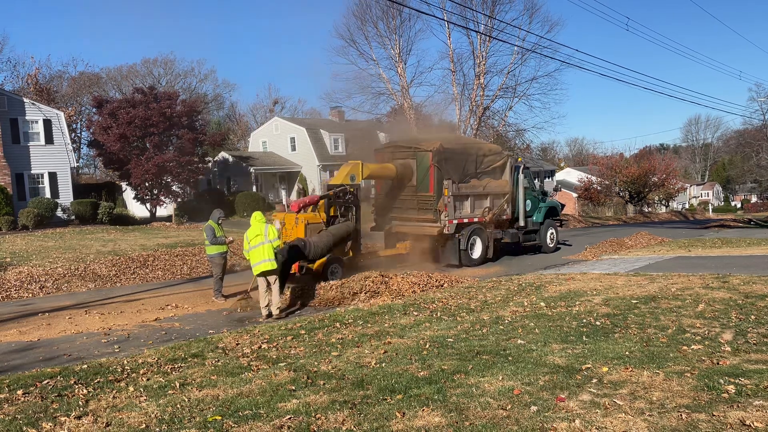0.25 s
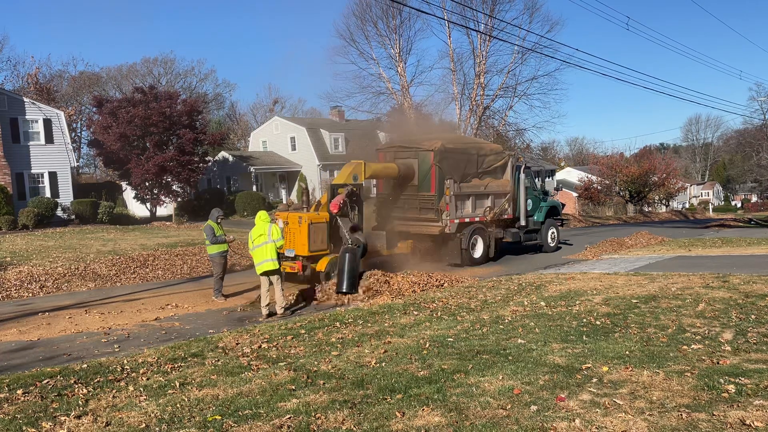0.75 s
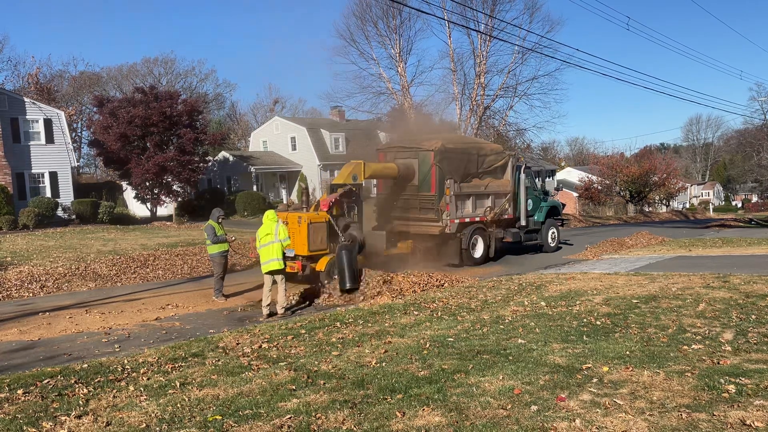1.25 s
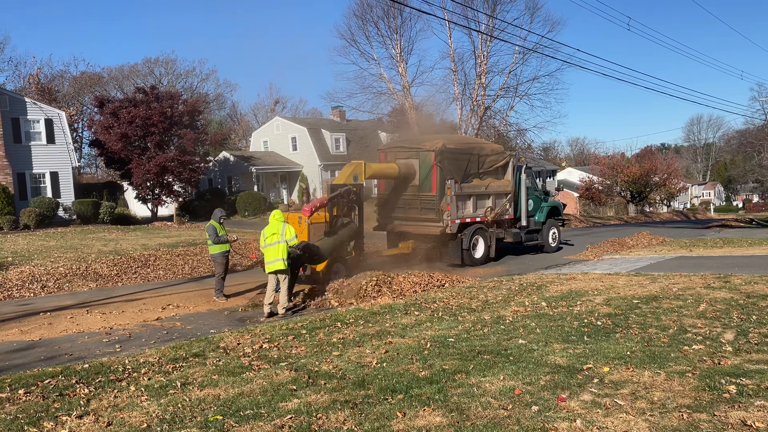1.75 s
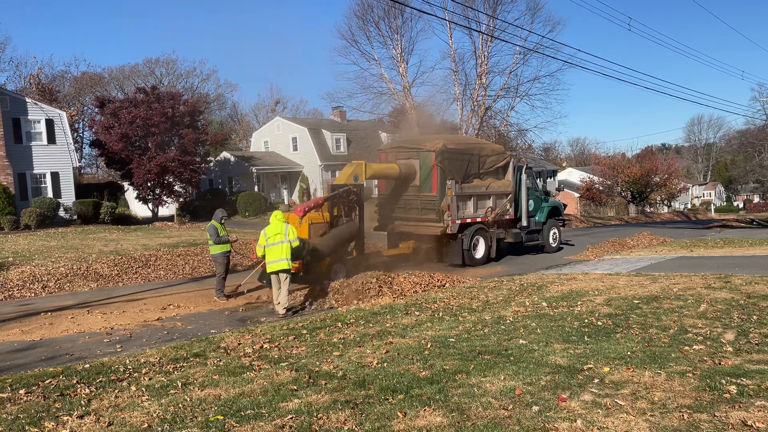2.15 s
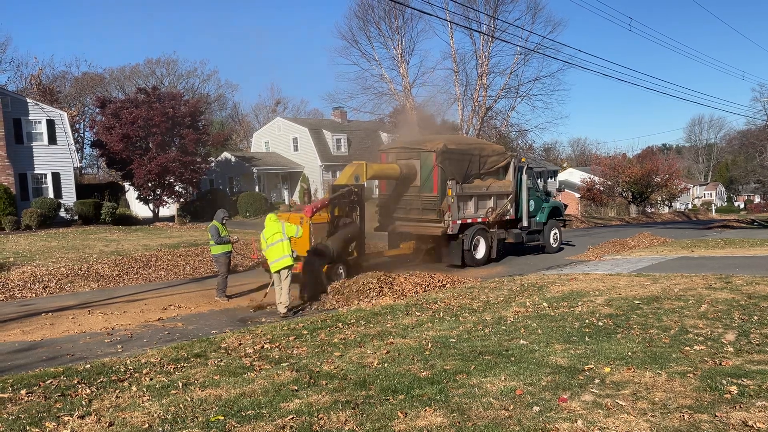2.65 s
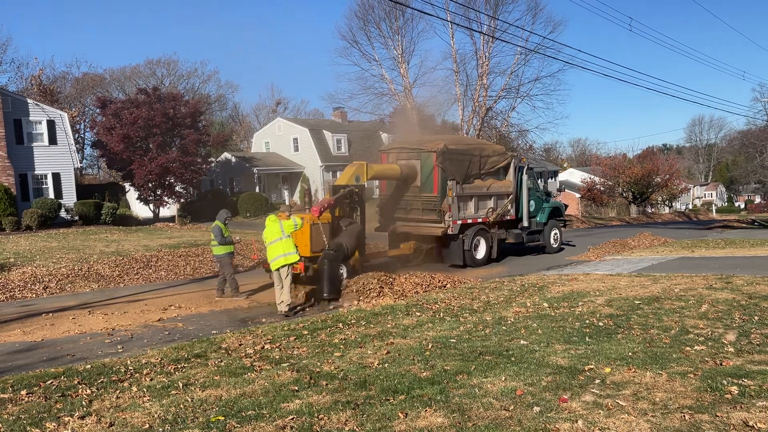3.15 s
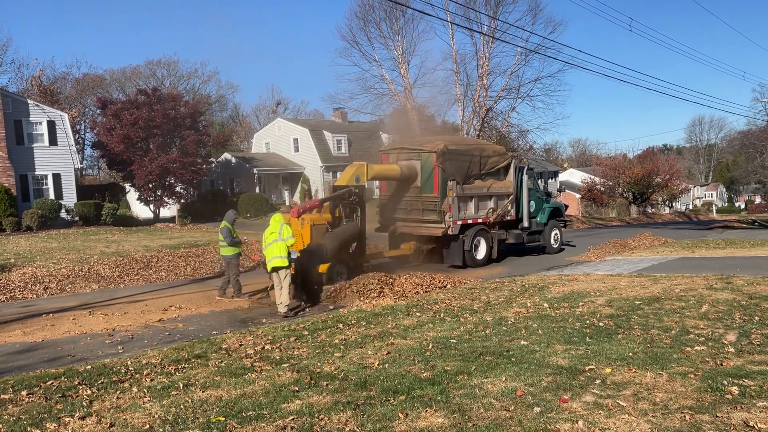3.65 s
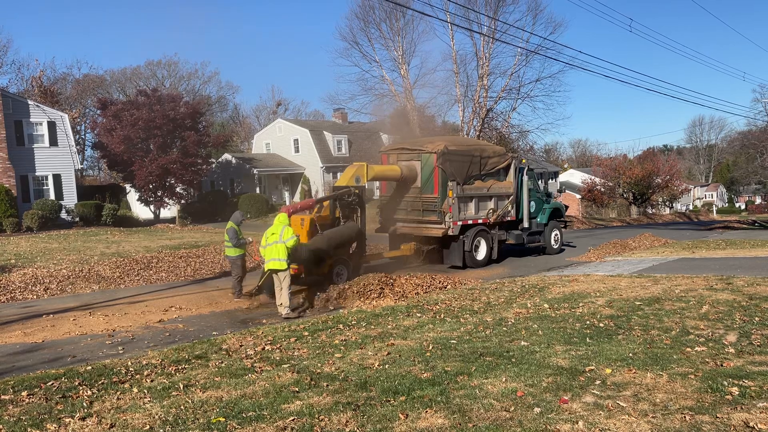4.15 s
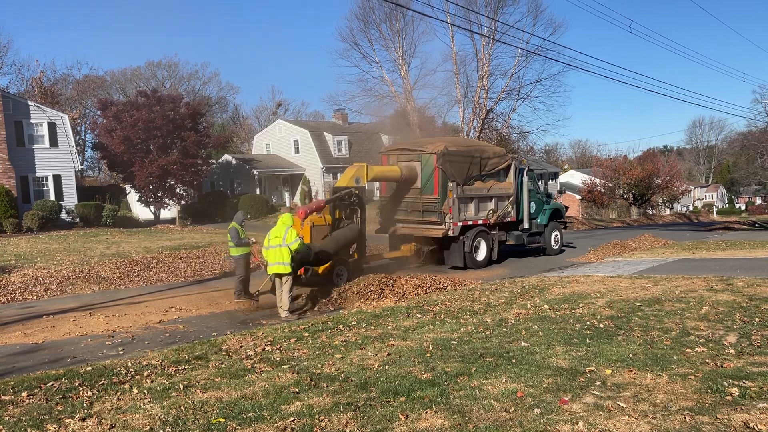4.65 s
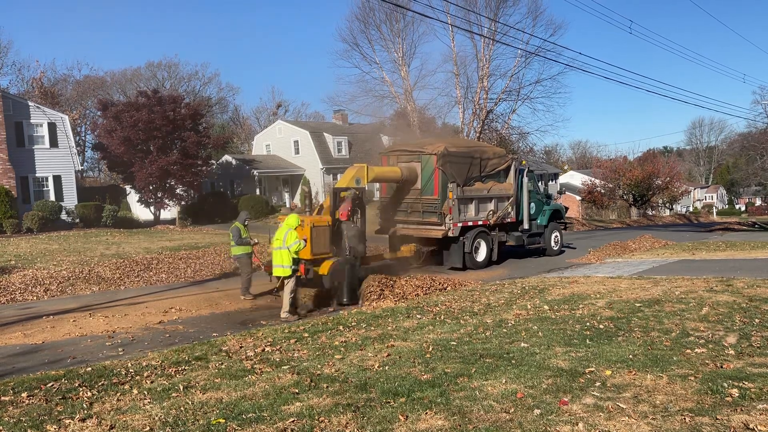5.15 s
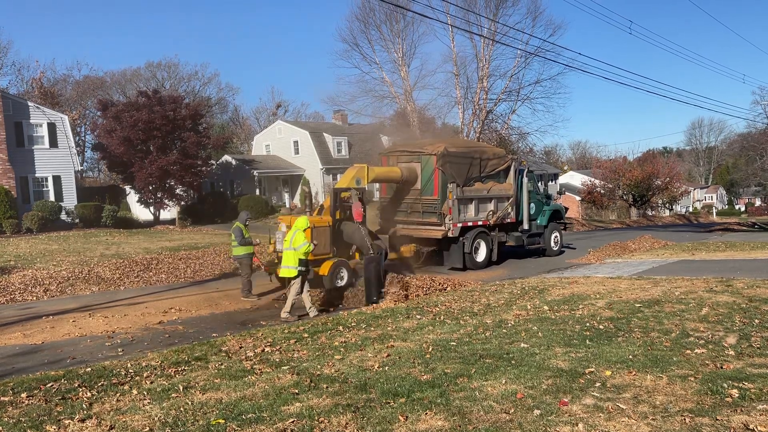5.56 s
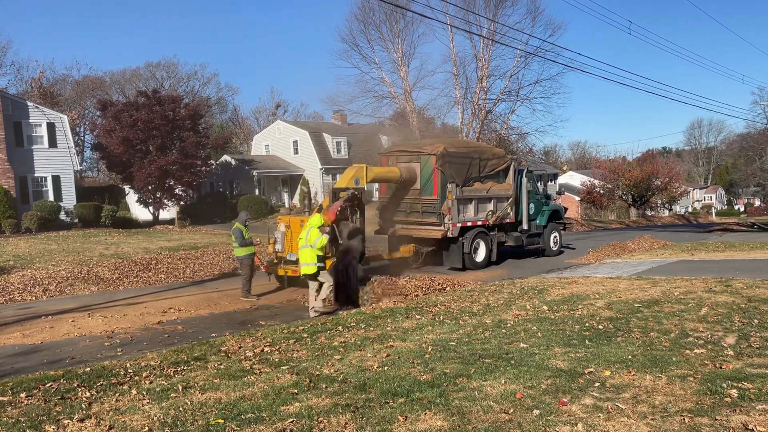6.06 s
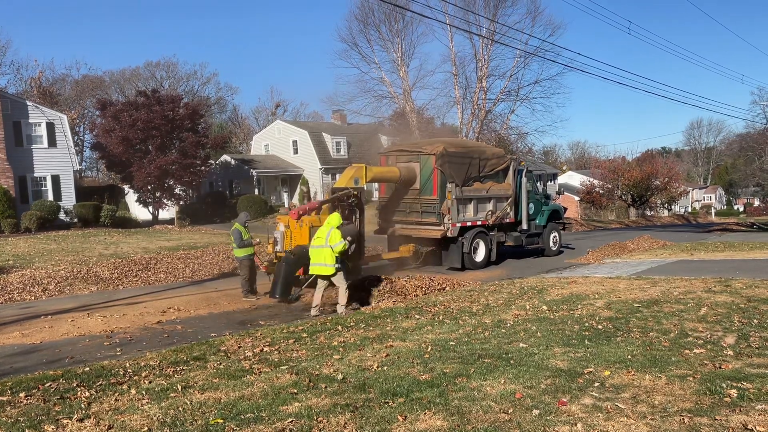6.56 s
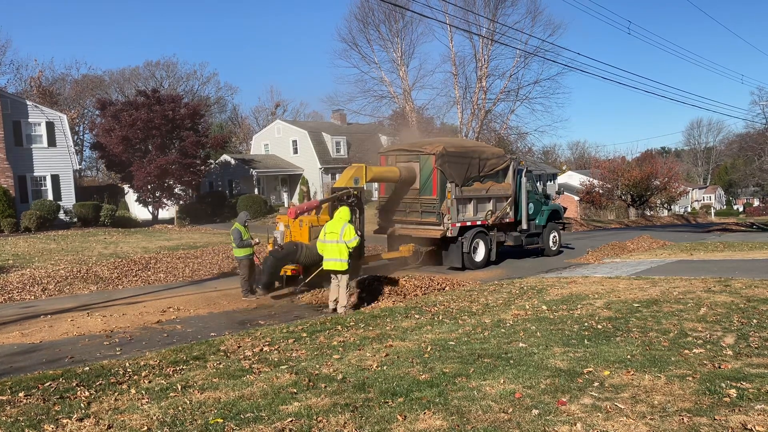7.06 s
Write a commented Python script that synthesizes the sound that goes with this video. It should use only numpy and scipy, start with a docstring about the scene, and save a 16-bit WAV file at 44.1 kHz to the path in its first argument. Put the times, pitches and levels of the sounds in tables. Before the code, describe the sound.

Outdoors on a breezy suburban street, a leaf vacuum's engine holds a low, steady drone under a broad fan roar. Dry leaves rush through hose and chute in swelling, crackling waves, with twigs and stones ticking on the housing. Wind flaps and rumbles close on a handheld phone microphone standing on a lawn across the road, strongest at the start and around the middle.

```python
"""The ear first meets an engine's drone, the hiss of dry leaves and flaps of wind: a truck-towed leaf vacuum
works across the street from a phone held on a lawn on a breezy day. The engine is a harmonic series on its
shaft rate, the fan's roar is shaped noise throbbing with the shaft, and leaves in fan, hose and chute are
noise streams with random crackles. Twigs and stones tick as short bursts of band noise; wind buffets the two
microphone ports as rumble, a brighter edge and puffs."""
import sys
import numpy as np
from scipy import signal
from scipy.fft import rfft, irfft, next_fast_len
from scipy.io import wavfile
from scipy.ndimage import uniform_filter1d

SR = 44100
rng = np.random.default_rng(int(sys.argv[2]) if len(sys.argv) > 2 else 0)


def waveform_to_disk(signal):
    """Save audio, clipped to [-1, 1], as 16-bit WAV at the path in sys.argv[1]."""
    frames = np.transpose(np.atleast_2d(signal))
    scaled = np.clip(frames, -1, 1) * 32767
    samples = np.round(scaled).astype(np.int16)
    wavfile.write(sys.argv[1], SR, samples)


def undo_db(level):
    """Turn decibels back into plain size, where 20 dB means ten times bigger."""
    steps = np.asarray(level, float) / 20
    return 10 ** steps


N = 322371  # length in samples
SIZE = next_fast_len(N, True)  # transform length
TIME = np.arange(N) / SR
HZ = np.maximum(np.fft.rfftfreq(SIZE, 1 / SR), 1)


def noise():
    """White noise: two statistically independent signals of unit variance."""
    return rng.standard_normal((2, N))


def colour(x, table):
    """Spectral shaping: white noise is weighted to a power density, straight in dB over log frequency."""
    hz, density_db = np.transpose(table)
    gain = undo_db(np.interp(np.log(HZ), np.log(hz), density_db)) * np.sqrt(SR / 2)
    return irfft(rfft(x, SIZE) * gain, SIZE)[..., :N]


def band(x, low_hz, high_hz, order=2):
    """Band-pass filtering: the gain offsets the narrower bandwidth, so unit white noise stays near unit rms."""
    edges = [low_hz, min(high_hz, .45 * SR)]
    y = signal.sosfilt(signal.butter(order, edges, "band", fs=SR, output="sos"), x)
    return y * np.sqrt(SR / 2 / (high_hz - low_hz))


def walk(rate_hz):
    """Smoothed random steps: levels held 1 / rate_hz seconds and averaged twice; spread near 1."""
    hold = int(SR / rate_hz)
    steps = np.repeat(rng.standard_normal(N // hold + 1), hold)
    return 1.14 * uniform_filter1d(uniform_filter1d(steps, hold), hold)[:N]


def bursts(rows, rise_s):
    """Exponential build-up and decay: the summed envelope of (time [s], level [dB], decay time [s]) rows."""
    env = np.zeros(N)
    for s, db, fall_s in rows:
        i = int(s * SR)
        t = TIME[:min(int(8 * fall_s * SR) + 1, N - i)]
        env[i:i + len(t)] += undo_db(db) * (1 - np.exp(-t / rise_s)) * np.exp(-t / fall_s)
    return env


# Engine speed, sagging under heavy loads:
# (time [s], shaft rate [turns per second, Hz], mean level of the sixth multiple [dB])
SHAFT = [(0.0, 32.36, -32), (0.38, 32.18, -21.5), (0.87, 32.19, -18), (1.1, 31.74, -27),
         (1.45, 31.49, -25.5), (1.89, 31.56, -17.5), (2.1, 31.64, -36), (2.54, 32.23, -19),
         (2.88, 32.42, -22), (3.2, 32.1, -30), (3.92, 32.14, -22), (4.2, 32.06, -31), (4.75, 32.29, -23),
         (5.4, 32.37, -18.5), (5.9, 31.8, -28), (6.16, 31.68, -22.5), (6.55, 31.87, -18), (6.82, 32.2, -34),
         (7.09, 32.45, -26), (7.3, 32.05, -32)]


def shaft_angle():
    """Rotation: the shaft's angle in radians is the running integral of its rate."""
    rate_hz = np.interp(TIME, *np.transpose(SHAFT)[:2])
    return 2 * np.pi * np.cumsum(rate_hz) / SR


# Firing tones: (multiple of the shaft rate, mean level [dB])
FIRING = [(2, -16), (4, -13.5)]
# Fainter exhaust tones: (multiple of the shaft rate, mean level [dB])
TONES = [(1, -41), (3, -34), (5, -38.5), (7, -33), (8, -43), (9, -47), (10, -41), (11, -39.5), (12, -37),
         (13, -70), (14, -72), (15, -49), (16, -70), (17, -38.5), (18, -39.5), (19, -37.5), (20, -41.5),
         (21, -44), (22, -40.5), (23, -49), (24, -45)]


def engine(turn):
    """Harmonic series: multiples of the shaft rate waver a little; uneven firing blurs the upper ones."""
    s, _, sixth_db = np.transpose(SHAFT)
    rows = TONES + FIRING + [(6, np.interp(TIME, s, sixth_db))]
    shake = .015 * walk(30)  # rad of shaft angle
    out = 0
    for k, db in rows:
        # the exhaust pipe delays each multiple a little more than the last
        phase = k * (turn + shake) - .7 * k * k
        waver_db = (.8 if k in (2, 4, 6) else 1.6) * walk(9)
        out = out + undo_db(db + waver_db) * np.sqrt(2) * np.cos(phase)
    return np.array([out, 0 * out])  # no unrelated part


# Fan and engine roar at the left port, with dips from the bounce off the road:
# (frequency [Hz], power density [dB per Hz])
ROAR = [(30, -44.5), (60, -37), (110, -48), (300, -52), (470, -69.5), (620, -50.5), (1000, -59),
        (1250, -58.5), (1470, -54.5), (1700, -60.5), (2000, -58), (2300, -66.5), (2600, -62), (4000, -78.5),
        (6000, -81), (8300, -91), (13000, -117.5), (16000, -88)]


def roar(turn):
    """Amplitude modulation: fan air and engine clatter throb with each firing and each turn."""
    throb = 1 + 0.024 * np.cos(2 * turn) + 0.056 * np.cos(turn) + 0.072 * np.cos(3 * turn)
    return colour(noise() * throb, ROAR)


# Leaves passing through: (time [s], rattle in the fan [dB], hiss in hose and chute [dB])
LOAD = [(0.0, -43, -35), (0.09, -34.5, -47), (0.27, -35.5, -46), (0.36, -30.5, -28), (0.55, -28.5, -33),
        (1.02, -28.5, -34), (1.5, -25, -32), (1.65, -29, -28.5), (1.9, -26, -37.5), (2.0, -31, -39),
        (2.27, -33.5, -42), (2.63, -28.5, -30.5), (3.12, -32, -33.5), (3.25, -33, -37.5), (3.5, -30.5, -32),
        (3.75, -30, -32), (4.0, -33, -38), (4.3, -34.5, -43), (4.65, -36.5, -44.5), (5.06, -30.5, -27.5),
        (5.24, -31, -32), (5.44, -28.5, -31), (5.69, -28, -34), (5.89, -27.5, -30), (6.52, -32, -34.5),
        (6.84, -37.5, -43.5), (7.3, -37.5, -46.5)]
# Spectrum of the fan rattle: (frequency [Hz], density over the load level [dB per Hz])
RATTLE = [(500, -56), (1000, -35.5), (1450, -31), (1700, -34.5), (2000, -33.5), (2270, -34), (2550, -34.5),
          (4000, -35.5), (5300, -40.5), (7000, -46), (16000, -84)]
# Spectrum of the hose and chute hiss: (frequency [Hz], density over the load level [dB per Hz])
HISS = [(1500, -50), (4000, -38), (5300, -42.5), (6300, -39.5), (8500, -38.5), (10500, -41), (13300, -46),
        (15600, -43), (16000, -50)]


def leaves():
    """Shot noise: a clumpy stream of countless scraps with louder crackles, in the fan and in the pipes."""
    s, *levels = np.transpose(LOAD)
    out = 0
    for db, tone, share in zip(levels, (RATTLE, HISS), (.2, .25)):
        flow = undo_db(np.interp(TIME, s, db) + 1.4 * walk(25) + 0.78 * walk(9))
        struck = rng.random(N) < 600 / SR  # about 600 crackles a second
        crackle = struck * undo_db(1.55 * np.minimum(rng.exponential(size=N), 4))
        crackle = signal.lfilter([1], [1, -.97], crackle)  # each scrap rustles for about a millisecond
        out = out + colour(noise() * flow * (0.86 + share * crackle), tone)
    return out


# Wind strength at the phone: (time [s], rumble level [dB])
BREEZE = [(0.0, -17), (0.65, -15), (0.8, -18.5), (1.19, -23.5), (1.42, -13.5), (1.7, -12.5), (1.85, -24),
          (2.25, -20.5), (2.86, -12.5), (3.1, -17.5), (3.35, -20.5), (3.61, -14.5), (4.1, -25.5),
          (5.1, -21), (5.3, -31), (5.7, -18.5), (6.17, -24.5), (6.39, -19.5), (6.75, -26), (6.95, -20),
          (7.3, -24)]
# Spectrum of the wind rumble: (frequency [Hz], density over the breeze level [dB per Hz])
BUFFET = [(25, -43), (60, -18.5), (110, -19), (170, -24), (260, -31.5), (500, -52.5), (2000, -102)]


def wind():
    """Turbulence at the ports: low rumble, a brighter edge in gusts, and flaps, nearly alike left and right."""
    breeze_db = np.interp(TIME, *np.transpose(BREEZE))
    rumble = colour(noise() * undo_db(breeze_db + 1.73 * walk(16)), BUFFET)
    # the edge gains 0.35 dB per dB of breeze
    steady = undo_db(-35 + 0.35 * (breeze_db + 20) + 3.4 * walk(14))
    edge_level = np.hypot(steady, gusts()) * undo_db(1.9 * walk(45))
    edge = edge_level * band(noise(), 188, 543, order=3)
    mid, side = rumble + edge + flaps()
    common = mid * undo_db([[.5], [-.5]])  # left 1 dB above right
    opposed = undo_db(-9.5) * side * np.array([[1], [-1]])
    return common + opposed


FLAP_S = .03  # length of a puff, s
# Sharp flaps of air across the ports: (time [s], peak level before the port balance [dB], centre [Hz])
FLAPS = [(0.009, -5.5, 560), (0.03, -5, 441), (0.058, -6, 490), (0.077, -14, 640), (0.277, -12.5, 420),
         (0.37, -12.5, 300), (0.46, -13, 380), (0.514, -8.5, 417), (0.795, -17.5, 300), (0.95, -19, 300),
         (1.236, -19, 353), (1.4, -16, 300), (1.453, -12, 390), (1.484, -13, 510), (1.52, -19, 380),
         (1.589, -14, 353), (1.66, -16.5, 300), (1.77, -24, 300), (1.91, -17, 300), (2.453, -19, 342),
         (2.529, -10.5, 425), (2.635, -15.5, 342), (2.697, -11.5, 387), (2.821, -19, 347),
         (3.007, -13, 400), (3.264, -9.5, 344.5), (3.554, -8.5, 448.6), (3.749, -12, 347), (4.17, -21, 320),
         (4.686, -19, 230), (5.693, -14, 423), (5.735, -17, 239.2), (6.19, -22, 320)]


def flaps():
    """Windowed turbulence: each flap is one smooth puff of eddies around its own pitch."""
    out, air = np.zeros((2, N)), noise()
    puff = np.hanning(int(FLAP_S * SR))
    for s, db, hz in FLAPS:
        start = max(int((s - .007) * SR), 0)
        eddies = band(air[:, start:start + SR // 5], hz / 2.04, hz * 1.37, order=3)
        eddies = eddies[:, -len(puff):] * puff  # the filter has settled by here
        peak = np.abs(eddies).max(axis=1, keepdims=True)
        out[:, start:start + len(puff)] += undo_db(db) * eddies / peak
    return out


def gusts():
    """Power addition: the longer swells of the edge that carry the flaps sum as bell-shaped powers."""
    under_db, width_s = -9, 0.063 / 3  # level against the flap's peak; time to fall to 1/e in power
    power = 0
    for s, db, _ in FLAPS:
        power = power + undo_db(2 * (db + under_db)) * np.exp(-((TIME - s - FLAP_S / 4) / width_s) ** 2)
    return np.sqrt(power)


# Twigs and stones striking the fan housing: (time [s], envelope level [dB], centre [Hz])
TICKS = [(0.5705, -19, 2660), (1.475, -26, 4056), (1.588, -22, 2955), (1.774, -17, 2523),
         (1.8483, -22, 2490), (1.924, -22.5, 3398), (1.957, -31, 2370), (2.07, -23, 2540),
         (2.2707, -28, 3808), (2.619, -26, 4025), (2.809, -19, 3950), (3.049, -23.5, 2153),
         (3.1103, -23, 2020), (3.471, -23, 3570), (3.996, -18.5, 2560), (4.177, -25.5, 3493),
         (5.877, -19.5, 2800), (5.912, -25, 3605), (5.983, -19, 2400), (5.995, -19.5, 1400),
         (6.6402, -25, 2300), (6.8929, -27, 2536)]


def ticks():
    """Impact excitation: short grainy rattles, each around its own centre, with a softer trail of scraps."""
    out = np.zeros((2, N))
    air = noise() * undo_db(1.4 * walk(400))  # a shower of scraps, not one blow
    for s, db, hz in TICKS:
        part = slice(int(s * SR), int(s * SR) + SR // 4)
        blow, trail = (s, db, 0.009), (s, db - 8, 0.04)
        env = bursts([blow, trail], 0.0033)
        out[:, part] += band((air * env)[:, part], hz / 3.1, hz * 2.2, order=3)
    return out


# Right port against left: (frequency [Hz], level [dB], phase lead [rad], likeness [0-1])
PORTS = [(30, -1, 0, .99), (300, -1, .2, .95), (470, -1, .6, .86), (650, -7, -1.1, .5), (780, -11, .9, .6),
         (1000, -6, .9, .8), (1250, -3, -.1, .85), (1500, -12, -.8, .4), (1600, -9, 1.2, .55),
         (1900, -2, .2, .91), (2200, -6, -.45, .68), (2400, -2, -.1, .86), (2700, -7, -.8, .78),
         (3400, -1, -.1, .87), (3900, 0, -.1, .91), (5000, -3, -1.35, .55), (5900, -3, 0, .55),
         (7400, 0, 2.6, .93), (8300, 0, 3.14, .998), (9700, 0, 4.9, .96), (11500, 0, 6.28, .998),
         (13200, 0, 7.5, .96), (14600, 0, 9.3, .998), (16000, 0, 9.6, .998)]


def ports(pair):
    """Partial coherence: left hears the first signal; right a shifted, shaded copy blended with the second."""
    columns = np.transpose(PORTS)
    db, lead, like = (np.interp(HZ, columns[0], c) for c in columns[1:])
    like = np.clip(like, 0, 1)
    first, second = rfft(pair, SIZE)
    right = undo_db(db) * (like * np.exp(1j * lead) * first + np.sqrt(1 - like ** 2) * second)
    return np.array([pair[0], irfft(right, SIZE)[:N]])


def scene():
    """Superposition: the machine across the street through both ports, plus wind."""
    turn = shaft_angle()
    return ports(engine(turn) + roar(turn) + leaves() + ticks()) + wind()


def low_pass(x):
    """Removes everything above the highest recorded frequency."""
    return signal.sosfilt(signal.butter(12, 16000, fs=SR, output="sos"), x)


def record(dry):
    """Filtering and compression: the phone cuts deep bass and top, its case notches the treble; it evens
    the level and rounds the loudest peaks."""
    x = signal.sosfilt(signal.butter(3, 42, "high", fs=SR, output="sos"), dry)
    for hz, share in ((5300, 0.33), (6200, 0.36)):
        x = x - share * signal.lfilter(*signal.iirpeak(hz, 18, fs=SR), x)
    # gain control: level aimed at (dB), share of the departure in dB taken back, memory (s)
    hold_db, squeeze, listen_s = -10, 0.36, 0.057
    keep = np.exp(-1 / (listen_s * SR))
    target = undo_db(2 * hold_db)  # as a power
    power = signal.lfilter([1 - keep], [1, -keep], np.mean(x ** 2, axis=0), zi=[target])[0]
    x = x * (target / power) ** (squeeze / 2)
    x = .96 * np.tanh(x / .96)
    x = signal.sosfilt(signal.ellip(10, .2, 70, 15700, fs=SR, output="sos"), x)
    return low_pass(x)


dry = scene()
out = record(dry)
waveform_to_disk(out)
```